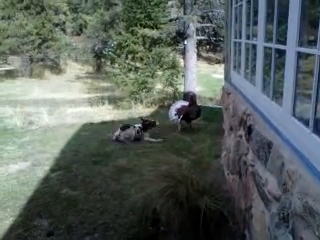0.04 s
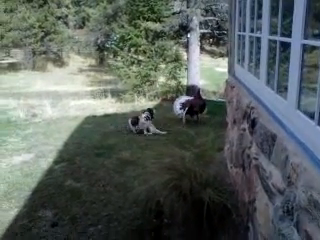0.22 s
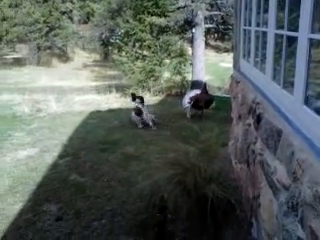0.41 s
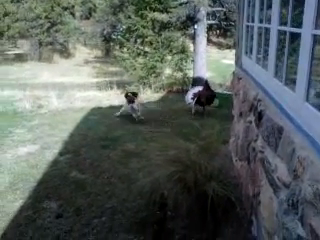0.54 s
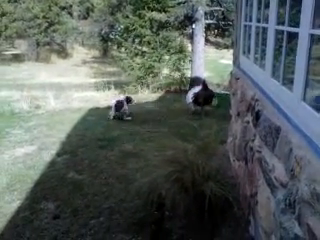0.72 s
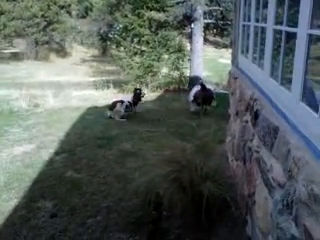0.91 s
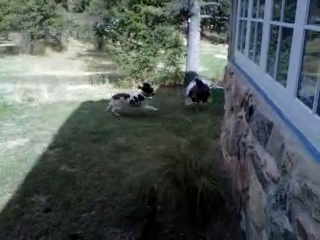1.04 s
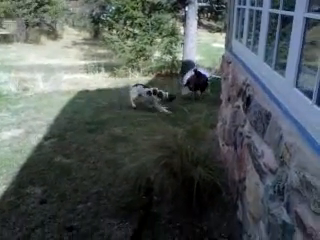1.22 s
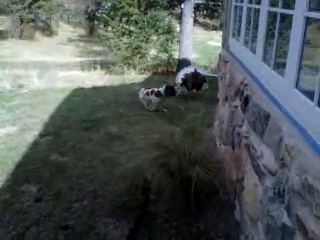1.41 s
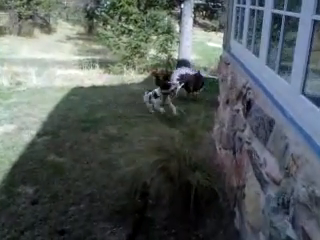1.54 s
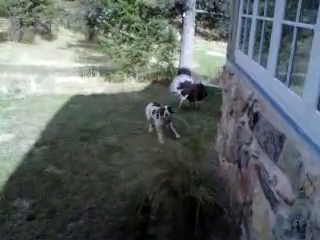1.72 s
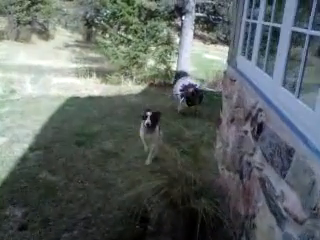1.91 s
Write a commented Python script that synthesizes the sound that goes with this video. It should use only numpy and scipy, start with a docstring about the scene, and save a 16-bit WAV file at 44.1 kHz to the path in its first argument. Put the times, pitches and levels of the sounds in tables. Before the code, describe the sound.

A turkey gobbles loudly outdoors right after a puppy gives a single bark.

```python
"""Puppy and turkey on a lawn

One microphone on the grass beside a house. A puppy barks once and the turkey answers with a gobble,
a fast chain of reedy notes that jump between registers, while the puppy adds muffled woofs.
A dry hiss swells in the gobble and fades; soft thuds and a little scuffing come from the ground.
The house wall and a near tree return a faint echo of both animals, over open air and a low rumble."""
import sys
import numpy as np
from scipy import signal
from scipy.fft import rfft, irfft
from scipy.io import wavfile

SR = 44100
rng = np.random.default_rng(int(sys.argv[2]) if len(sys.argv) > 2 else 0)


def transcribe(u):
    """Save the signal u as a 16-bit wav file named by the first command-line argument.

    u: samples, shape (n,) or (channels, n), limited to [-1, 1]; the rate is SR.
    q: integer samples, one column per channel.
    """
    v = np.clip(np.atleast_2d(u).T, -1, 1)
    q = np.round(v * 32767).astype(np.int16)
    wavfile.write(sys.argv[1], SR, q)


N = 85995
T = np.arange(N) / SR


def turkey_gobble():
    """The turkey's throat sounds quick reedy notes that leap between low and high registers."""
    # (time [s], length [s], start pitch [Hz], middle pitch [Hz], end pitch [Hz], level [dB], swell [dB],
    #  octave at start [dB], octave at end [dB], overtones [dB], rasp [dB], pitch jitter [share])
    notes = [ (.063, 0.028, 1049, 1003, 964, -50.5, -1, -15, -13.5, -32.5, -28.5, 0.015),
             (.392, 0.037, 723, 817, 834, -39, 1.5, -17.5, 4.5, -13, -20, 0.053),
             (.449, 0.028, 811, 759, 716, -38, -8, -5.5, 6.5, -10, -25, 0.038),
             (.478, 0.033, 802.4, 769.3, 733, -38, 1.5, -2.5, 12.5, -12, -18.5, .025),
             (.521, 0.022, 731, 751.6, 777, -36.5, 3, 6, 14.5, -16, -26.5, 0.014),
             (.543, 0.024, 787, 810, 826, -30, 3, 17, 1.5, -15, -32, 0.013),
             (.570, 0.033, 850, 896, 963, -26, -7.5, -7.5, -4, -19.5, -21.5, 0.039),
             (.609, 0.066, 654.4, 673.3, 675, -25, -0.5, 10, -9, -1, -18, 0.0077),
             (.665, 0.026, 1124, 1070, 1106, -29.5, -6, -21, -25.5, -27.5, -28, 0.021),
             (.668, 0.049, 1039, 985, 964, -29, 13, -10.5, -7.5, -4.5, -11, 0.025),
             (.727, 0.071, 1293, 1300, 1200, -31.5, -2.5, -26, -29, -18, -17.5, 0.032),
             (.776, 0.024, 1210, 1353, 1358, -34, 0.5, -27.5, 3, -4.5, -7.5, 0.041),
             (.942, 0.022, 789, 905, 977, -29, -1.5, -36, 5.5, -14, -6.5, 0.027),
             (.959, 0.012, 664, 653, 640, -37.5, -0.5, -19.5, 13.5, -7, -10.5, 0.033),
             (.965, 0.037, 844.5, 884.4, 959, -25, 3, -12.5, -15, -17, -11.5, 0.028),
             (1.007, 0.03, 1132, 1104, 1100, -25, 1, -20.5, -29, -31, -36.5, 0.0097),
             (1.042, .014, 950, 927, 956, -22, -8, -18.5, -18, -14.5, -34, 0.012),
             (1.057, 0.017, 1010, 969, 952, -33.5, 0, 5.5, -13, -6, -16, 0.026),
             (1.069, 0.027, 1277, 1331, 1266, -31.5, 4, 2.5, -1.5, -11, -10.5, 0.032),
             (1.100, 0.01, 1304, 1251, 1310, -19, -4, -27.5, -21.5, -29.5, -28, 0.013),
             (1.117, 0.026, 1301, 1220, 1178, -28, -1, -22, -21, -24, -20, 0.042),
             (1.159, 0.018, 875, 749, 632, -44.5, 9, 14.5, 1, -17, -14, 0.054),
             (1.300, 0.012, 612, 556, 577, -45.5, 5.5, -2.5, 8, -15.5, -12, .04),
             (1.316, 0.021, 625, 586, 583, -33.5, -13.5, -22, 8.5, -30, -18, 0.021),
             (1.346, 0.031, 1362, 1184, 1076, -26, -1.5, -18, -36.5, -26.5, -31, 0.037),
             (1.405, 0.019, 1276, 1233, 1143, -25, -6, -28.5, -25.5, -17, -22.5, 0.014),
             (1.427, 0.06, 1091, 1054, 1015, -40.5, -27.5, -25, -5, -28, -21, 0.03),
             (1.885, 0.04, 1193, 1130, 1128, -36.5, -6, -22, -16, -35, -37, 0.0092),
             (1.915, 0.024, 1087, 1062, 1040, -49, -0.5, -12.5, -13, -37, -21, .02)]
    # the throat's colour on the overtones, then on the rasp: (frequency [Hz], gain [dB])
    throat = [(1800, -9), (2100, 4), (2750, -3), (3050, -6.5), (3450, -11), (4050, -14.5), (4750, -9.5),
              (5400, -15.5), (6100, -30), (7000, -35.5)]
    rasp_colour = [(120, -50.5), (400, -43), (650, 1.5), (1100, 3), (1600, 3.5), (2200, -14), (2800, 9),
                   (3400, -6), (4300, -35.5), (5100, -34.5), (6000, -28), (7000, -40.5)]
    voice = reedy_notes(notes, throat, rasp_colour, attack_s=0.0063, release_s=0.009, arch_db=2.5,
                        jitter_hz=453, shimmer=0.12, shimmer_hz=188)
    return high_pass(voice, hz=395)


def turkey_rattle():
    """A harsh, fast-throbbing burst of noise at the height of the gobble."""
    # the burst: (time [s], length [s], level [dB])
    events = [(1.072, 0.033, -34.5)]
    # its harsh colour: (frequency [Hz], gain [dB])
    spectrum = [(900, -42), (1800, -13), (2250, 0), (2600, 2.5), (3050, -10.5), (3400, -7.5), (4300, -37.5),
                (5100, -17.5), (6500, -51.5)]
    throb_hz, throb_depth = 228, 0.98
    throb = 1 + throb_depth * np.sin(2 * np.pi * throb_hz * T)
    return bursts(events, spectrum, attack_s=0.0068, release_s=0.031) * throb


def puppy_bark():
    """Rough pulses rise in pitch while the mouth opens and shuts, sweeping its resonance down."""
    # the course of the bark: (time [s], pitch [Hz], level [dB], mouth resonance [Hz], treble [dB],
    #  rasp [dB], nasal ring [dB])
    course = [(.184, 122, -56, 900, -2.5, -4, 4), (.195, 170, -45.5, 922, -22, -6.5, -5),
              (.204, 232.3, -35.5, 930, 5, 7.5, -6), (.216, 293, -24.5, 956, 7.5, 16, 2.5),
              (.226, 334.5, -20.5, 990, 5.5, -5.5, 6), (.234, 350.4, -12.5, 1020, 13, -5, 19.5),
              (.243, 353.8, -16.5, 760, 8, -3.5, 23.5), (.253, 370, -11, 757, 16, -10.5, 10),
              (.264, 407, -20.5, 635, 18.5, -4, 3), (.278, 403, -13.5, 627, 11, -10, -13.5),
              (.290, 407.3, -17.5, 593, 4.5, -10.5, 1.5), (.312, 408.6, -16, 713, -1.5, -5, 17.5),
              (.322, 427, -21.5, 645, -18.5, -1.5, 7), (.330, 431, -33, 766, -19.5, 2, 2.5),
              (.345, 405, -52, 747, -5.5, -6, 4)]
    # the puppy's throat: (frequency [Hz], gain [dB])
    throat = [(100, -13.5), (280, -2.5), (420, 2), (800, 0), (1250, -6.5), (1600, -1), (2100, -1),
              (2500, -11.5), (3000, -28), (3400, -56.5), (3900, -60), (4600, -30.5), (5400, -47.5),
              (7000, -48)]
    mouth_width_hz, mouth_db = 136, 19.5
    nasal_hz, nasal_width_hz = 1100, 120
    jitter = 0.014  # share of the pitch
    pitch, db, mouth_hz, treble_db, rasp_db, nasal_db = in_time(course)
    on = (T > course[0][0]) & (T < course[-1][0])
    pitch = pitch * (1 + jitter * drift(rate_hz=270))
    phase = 2 * np.pi * np.cumsum(pitch[on]) / SR
    k = harmonics(count=20)
    hz = k * pitch[on]
    mouth = 1 + from_db(mouth_db) / (1 + ((hz - mouth_hz[on]) / mouth_width_hz) ** 2)
    nasal = from_db(nasal_db[on]) / (1 + ((hz - nasal_hz) / nasal_width_hz) ** 2)
    treble = from_db(treble_db[on] / (1 + (1300 / hz) ** 4))  # shelf above 1300 Hz
    gains = colour(throat, hz) * (mouth + nasal) * treble
    gains = gains / np.sqrt(np.sum(gains ** 2, axis=0) / 2)  # unit power
    rough_depth = from_db(rasp_db[on]) / (1 + (800 / hz) ** 2)  # upper harmonics are rougher
    rough = (1 + rough_depth * wobble(rate_hz=346, count=20)[:, on]) / np.sqrt(1 + 2 * rough_depth ** 2)
    partials = np.imag(rough * np.exp(1j * k * (phase + k)))
    voice = np.zeros(N)
    voice[on] = from_db(db[on]) * np.sum(gains * partials, axis=0)
    return high_pass(voice, hz=206)


def puppy_woofs():
    """Grunts and woofs muffled by a closed mouth, at both ends of the bark and during the gobble."""
    # (time [s], length [s], start pitch [Hz], middle pitch [Hz], end pitch [Hz], level [dB], swell [dB],
    #  octave at start [dB], octave at end [dB], overtones [dB], rasp [dB], pitch jitter [share])
    notes = [ (.188, 0.028, 129.6, 211, 275.5, -35, 25.5, -14.5, 0, -26.5, -9, 0.042),
             (.302, 0.023, 500.4, 504, 510, -15, -5, -35.5, -30.5, -33.5, -34, 0.028),
             (.308, 0.04, 235.5, 222, 199.6, -43, -7.5, -12.5, -8, -19.5, -1, 0.032),
             (.805, 0.034, 98.5, 121, 130, -53, 5, 7.5, 14, -3, -12, .04),
             (.841, 0.055, 133, 150.4, 152.5, -43, 5, 16, 2, -7.5, 5.5, 0.071),
             (.914, 0.046, 133.1, 128.8, 137, -45, 2, 9.5, -18.5, -5.5, -4.5, 0.1),
             (1.403, 0.044, 218, 261.7, 256, -38.5, 10.5, -16, -2, -22, -7, 0.033),
             (1.444, 0.022, 257.3, 243.3, 236, -31, 6, 4.5, 0.5, -8.5, -1, 0.043),
             (1.463, 0.027, 228.3, 251, 241.2, -30.5, 5, 2, 7.5, -14.5, -2, .01),
             (1.494, 0.032, 241.7, 238, 254, -48.5, -9, -1, 0, -8.5, 6, 0.022)]
    # the throat's colour on the overtones, then on the rasp: (frequency [Hz], gain [dB])
    throat = [(400, -17.5), (650, 3.5), (1000, -8), (1400, -16), (2000, -13), (2700, -39), (5000, -45.5)]
    rasp_colour = [(30, -43), (80, -29), (150, -3.5), (300, -10), (550, 1.5), (850, -21.5), (1400, -22.5),
                   (2000, -17), (2800, -54.5), (6000, -53)]
    return reedy_notes(notes, throat, rasp_colour, attack_s=0.016, release_s=0.016, arch_db=4.5,
                       jitter_hz=400, shimmer=0.15, shimmer_hz=130)


def reedy_notes(notes, throat, rasp_colour, attack_s, release_s, arch_db, jitter_hz, shimmer, shimmer_hz):
    """Gliding voiced notes: overtones bloom in mid-note and pitch jitter smears the high ones."""
    out = np.zeros(N)
    k = harmonics(count=12)
    rasp = noise(rasp_colour)
    waver = drift(jitter_hz)
    unsteady = (1 + shimmer * wobble(shimmer_hz, count=12)) / np.sqrt(1 + 2 * shimmer ** 2)
    for (onset, length, start_hz, middle_hz, end_hz, db, swell_db,
         octave_start_db, octave_end_db, overtones_db, rasp_db, jitter) in notes:
        on = (T > onset - attack_s) & (T < onset + length + release_s)
        t = T[on] - onset
        progress = np.clip(t / length, 0, 1)
        edge = (2 * progress - 1) ** 2  # 1 at the note's ends, 0 in its middle
        glide = np.polyfit([0, .5, 1], [start_hz, middle_hz, end_hz], 2)
        pitch = np.polyval(glide, progress) * (1 + jitter * waver[on])
        phase = 2 * np.pi * np.cumsum(pitch) / SR
        dull_db_per_khz = 10.0 * edge + 0.11 * max(-overtones_db, 0)
        khz_above_third = np.maximum(k - 3, 0) * pitch / 1000
        dull_db = dull_db_per_khz * khz_above_third + 2.6 * edge
        gains = colour(throat, k * pitch) * from_db(overtones_db - dull_db)
        gains[0] = 1  # fundamental and octave are set apart from the throat's colour
        gains[1] = from_db(octave_start_db + (octave_end_db - octave_start_db) * progress)
        partials = np.imag(unsteady[:, on] * np.exp(1j * k * (phase + k)))
        tone = np.sqrt(2) * np.sum(gains * partials, axis=0)
        puffs = from_db(rasp_db) * rasp[on] * (1 + 0.22 * np.sin(phase))  # one puff a cycle
        level = from_db(db + swell_db * (progress - .5) - arch_db * edge)
        out[on] += (tone + puffs) * gate(t, length, attack_s, release_s) * level
    return out


def yard_echo(voice):
    """The microphone gets the direct voice, reflections off the house wall and a tree, and dull scatter."""
    wall_delay_s, wall_db = 0.013, -16
    tree_delay_s, tree_db = 0.015, -15
    t60_s, scatter_band_hz, scatter_db = 0.43, [700, 3070], -19
    tail = rng.standard_normal(N) * from_db(-60 * T / t60_s) * (T > wall_delay_s)
    band = signal.butter(2, scatter_band_hz, "band", fs=SR, output="sos")
    tail = signal.sosfilt(band, tail / np.sqrt(np.sum(tail ** 2)))
    wall = from_db(wall_db) * np.interp(T - wall_delay_s, T, voice)
    tree = from_db(tree_db) * np.interp(T - tree_delay_s, T, high_pass(voice, hz=910))
    scatter = from_db(scatter_db) * signal.fftconvolve(voice, tail)[:N]
    return voice + wall + tree + scatter


def dry_hiss():
    """A dry hiss flares briefly with the bark, then swells in the gobble and fades."""
    # its rise and fall: (time [s], level [dB])
    levels = [(0, -67.5), (.18, -86), (.205, -42), (.25, -63), (.34, -61.5), (.45, -64.5), (.9, -80),
              (1.03, -50), (1.08, -34), (1.12, -35), (1.19, -39.5), (1.28, -43), (1.35, -36.5),
              (1.42, -47.5), (1.53, -44.5), (1.60, -53), (1.68, -55.5), (1.8, -62), (1.95, -52)]
    # its colour, strongest near 3 kHz: (frequency [Hz], gain [dB])
    spectrum = [(100, -47.5), (400, -29), (800, -13), (1200, -9), (1700, -8), (2200, -10), (2900, 5),
                (3250, -2.5), (3700, -19.5), (4300, -26), (5100, -17.5), (6000, -35), (7200, -47.5)]
    return bed(levels, spectrum, flicker_db=1.46)


def ground_thuds():
    """Soft low thuds on the lawn, probably paws."""
    # each thud: (time [s], length [s], level [dB])
    events = [(.308, 0.013, -62), (.42, 0.059, -59.5), (.84, 0.153, -63), (1.305, 0.058, -52)]
    # their deep colour: (frequency [Hz], gain [dB])
    spectrum = [(20, -18), (50, -22), (75, 3), (110, -16.5), (250, -32), (1000, -78.5)]
    return bursts(events, spectrum, attack_s=0.02, release_s=0.03)


def grass_scuffs():
    """Brief, crisp scuffs in the grass as the gobble dies away."""
    # each scuff: (time [s], length [s], level [dB])
    events = [(1.516, 0.015, -49.5), (1.705, 0.012, -50), (1.717, 0.016, -42.5), (1.738, 0.027, -53)]
    # their bright colour: (frequency [Hz], gain [dB])
    spectrum = [(300, -35), (1200, -4), (2400, 8), (3300, 6.5), (4300, 8), (5500, 5), (7200, -12)]
    return bursts(events, spectrum, attack_s=0.002, release_s=0.011)


def outdoor_air():
    """Faint open air around the microphone, with a steady low rumble under it."""
    # the air's rise and fall: (time [s], level [dB])
    levels = [(0, -72.5), (.3, -62.5), (.9, -75), (1.45, -57), (1.56, -54.5), (1.95, -55.5)]
    # colour of the air, then of the rumble: (frequency [Hz], gain [dB])
    spectrum = [(100, -7.5), (400, -15), (1000, -10), (1650, 10.5), (2300, -3), (3200, -1.5), (4200, -2.5),
                (5500, -1.5), (7200, -8.5)]
    rumble_colour = [(15, -10.5), (40, -0.5), (80, -1.5), (150, -3), (400, -6), (900, -4),
                     (2000, -29), (6000, -56)]
    return bed(levels, spectrum, flicker_db=2.0) + from_db(-66) * noise(rumble_colour)


def bursts(events, spectrum, attack_s, release_s):
    """Short bursts of coloured noise."""
    level = sum(from_db(db) * gate(T - onset, length, attack_s, release_s) for onset, length, db in events)
    return noise(spectrum) * level


def bed(levels, spectrum, flicker_db):
    """Lasting noise that follows a level curve and flickers a little."""
    return noise(spectrum) * from_db(in_time(levels)[0] + flicker_db * drift(rate_hz=55))


def noise(spectrum):
    """Coloured noise of unit power."""
    hz = np.fft.rfftfreq(N, 1 / SR)
    return unit_power(irfft(rfft(rng.standard_normal(N)) * colour(spectrum, hz), N))


def drift(rate_hz):
    """Random wander of spread 1 up to the given rate."""
    hz = np.fft.rfftfreq(N, 1 / SR)
    return unit_power(irfft(rfft(rng.standard_normal(N)) / (1 + (hz / rate_hz) ** 2) ** 2, N))


def wobble(rate_hz, count):
    """Random wander of strength and phase, one row for each harmonic."""
    return np.array([drift(rate_hz) + 1j * drift(rate_hz) for _ in range(count)])


def gate(t, length, attack_s, release_s):
    """Smooth rise around 0, hold, smooth fall around the length."""
    rise = np.clip(.5 + t / attack_s, 0, 1)
    fall = np.clip(.5 + (length - t) / release_s, 0, 1)
    return np.sin(np.pi / 2 * rise) * np.sin(np.pi / 2 * fall)


def colour(spectrum, hz):
    """Gain of a spectrum at given frequencies."""
    points_hz, db = np.transpose(spectrum)
    return from_db(np.interp(np.log(hz + 1), np.log(points_hz), db))


def in_time(rows):
    """Each column of a curve, at every sample."""
    times, *columns = np.transpose(rows)
    return [np.interp(T, times, column) for column in columns]


def harmonics(count):
    """Harmonic numbers as a column."""
    return np.arange(1, count + 1)[:, None]


def high_pass(x, hz):
    """Roll off what lies under a frequency."""
    return signal.sosfilt(signal.butter(2, hz, "high", fs=SR, output="sos"), x)


def from_db(db):
    """Decibels to gain."""
    return 10 ** (np.asarray(db) / 20)


def unit_power(x):
    """Scale to unit power."""
    return x / np.sqrt(np.mean(x ** 2) + 1e-20)


def scene():
    """Both animals in the yard, over the ground sounds, the hiss and the open air, in mono."""
    turkey = turkey_gobble() + turkey_rattle()
    puppy = puppy_bark() + puppy_woofs()
    ground = ground_thuds() + grass_scuffs()
    background = dry_hiss() + outdoor_air()
    return (yard_echo(turkey) + yard_echo(puppy) + ground + background)[None]


def record(dry):
    """The top of the microphone's signal is cut steeply."""
    cutoff_hz = 7300
    return signal.sosfilt(signal.ellip(10, .3, 80, cutoff_hz, fs=SR, output="sos"), dry)


dry = scene()
out = record(dry)
transcribe(out)
```